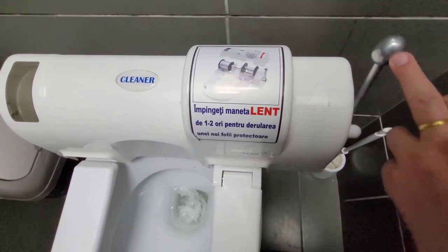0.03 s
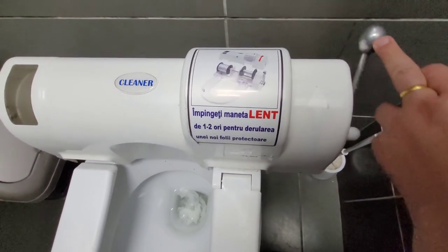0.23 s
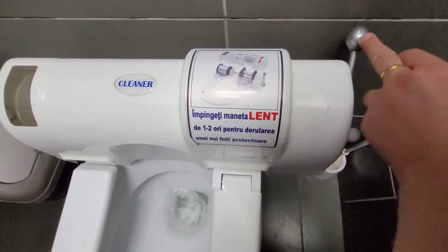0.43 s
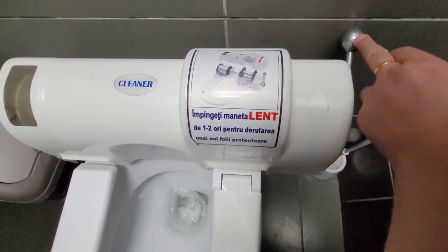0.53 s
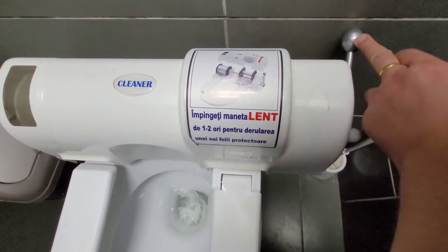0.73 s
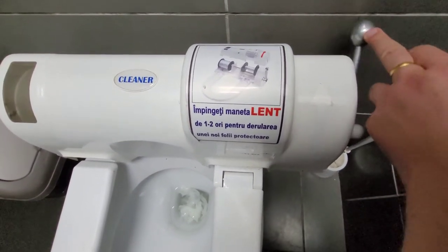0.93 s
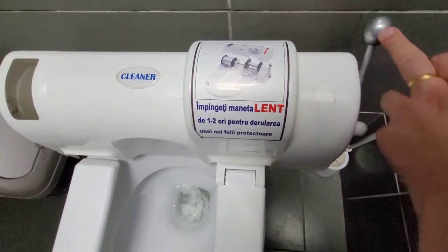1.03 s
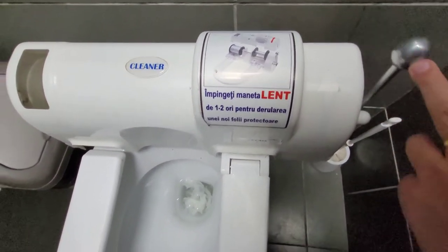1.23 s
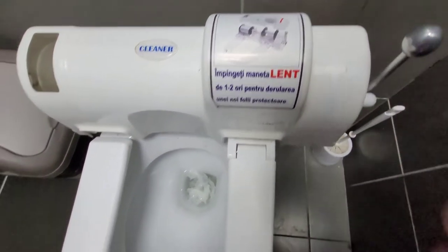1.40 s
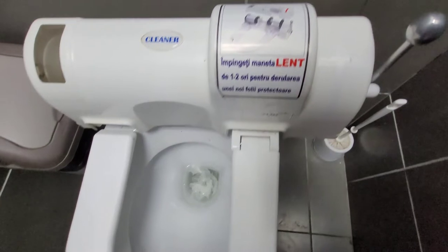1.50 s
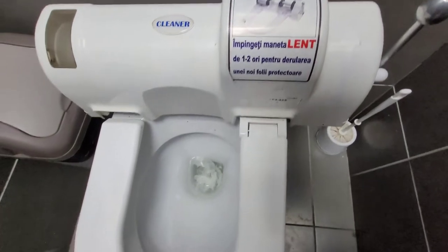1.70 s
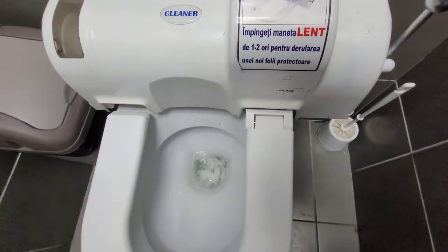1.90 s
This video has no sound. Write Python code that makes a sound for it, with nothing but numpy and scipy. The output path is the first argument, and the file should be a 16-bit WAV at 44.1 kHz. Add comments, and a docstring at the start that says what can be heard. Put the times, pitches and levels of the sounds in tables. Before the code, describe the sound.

Close up in a small tiled restroom, a seat cover dispenser's lever is worked. Two hollow knocks over softly hissing film lead to a loud metallic clack, then a faint squeak, a scraping clunk and a ringing spring.

```python
"""Seat cover dispenser in a small tiled restroom

Close by, a metal lever is pushed and let go. The cover film hisses off its roll while the drive
knocks twice in the hollow plastic housing. The lever clacks against its stop and shakes the housing,
squeaks faintly on the way back, then lands with a scrape, a low clunk and a ringing spring.
The tiles add a short echo, and faint room noise lies under it all."""
import sys
import numpy as np
from scipy import signal
from scipy.fft import rfft, irfft
from scipy.io import wavfile
from scipy.ndimage import uniform_filter1d, minimum_filter1d

SR = 44100
rng = np.random.default_rng(int(sys.argv[2]) if len(sys.argv) > 2 else 0)


def transcribe(signal):
    """Save signal, clipped to [-1, 1], as a 16-bit WAV file at the path in sys.argv[1]."""
    frames = np.atleast_2d(signal).T
    limited = np.clip(frames, -1, 1)
    pcm = np.round(limited * 32767).astype(np.int16)
    wavfile.write(sys.argv[1], SR, pcm)


N = 85995

# how the room spreads sound in stereo: f/Hz, width (side minus mid)/dB, left minus right/dB
STEREO_SPREAD = [(60, -11.5, -1.5), (200, -14, -2.5), (378, -4.5, 0), (690, -6, 0), (1220, 4, -4.5),
                 (2280, -0.5, -6), (4724, 1, -5), (8100, -5, -3), (14000, -9.5, 0)]
DIRECT_PAN_DB = -3.5  # the dispenser is a little to the right
KNOCK_RISE_S = .005


def housing_knocks(boom_rise_s=.011, boom_pan_db=-2.5, echo_db=-13.5):
    """Each blow rings the hollow shell, rattles loose parts and makes the stall boom."""
    # blows on the housing: t/s, shell level/dB, brightness/Hz, boom level/dB, rattle level/dB
    blows = [(0.1600, -35, 917, -53, -23), (0.2235, -11, 320, -28.5, -13), (0.3690, -12, 410, -32, 8.5),
             (0.3940, -27.5, 604, -38.5, -12), (0.5961, -21.5, 876, -45.5, 9.5),
             (0.6290, -18, 630, -37, -24), (1.3173, -23, 600, -19, 2), (1.3410, -42.5, 591, -28, -18),
             (1.3630, -32.5, 500, -28.5, -3.5)]
    # tones the plastic shell rings at: f/Hz, level/dB, fade time/s
    shell_tones = [(121.4, -22.5, 0.37), (156.5, -23.5, .25), (206, -29.5, .17), (237.4, -3, .3),
                   (248.1, 1.5, 0.14), (282, -9, .3), (319.6, -18, 0.4), (353.3, -24.5, 0.2),
                   (397, -21, 0.44), (433, -21, 0.46), (552.9, -21, 0.45), (704.5, -20.5, 0.46),
                   (829, -16.5, 0.25), (902, -14, 0.34)]
    # deep tones of the wall and stall: f/Hz, level/dB, fade time/s
    stall_tones = [(45.5, -10, .55), (63, -7, .25), (74.8, 0, .62), (110, -9, .15)]
    # dull rattle of the loose parts: f/Hz, level/dB
    rattle_spectrum = [(105, -37.5), (135, -37.5), (190, -27.5), (300, -29), (450, -36.5), (650, -42.5),
                       (900, -45.5), (1600, -59), (3200, -52.5), (8000, -70)]
    shell, boom, rattle_power = 0, 0, 0
    for start, db, bright_hz, boom_db, rattle_db in blows:
        for hz, tone_db, fade_s in shell_tones:
            dulling = np.hypot(1, (hz / bright_hz) ** 2)  # weakens tones above the blow's brightness
            shell = shell + gain(db + tone_db) / dulling * ring(start, hz, KNOCK_RISE_S, fade_s)
        for hz, tone_db, fade_s in stall_tones:
            boom = boom + gain(boom_db + tone_db) * ring(start, hz, boom_rise_s, fade_s)
        rattle_power = rattle_power + (gain(rattle_db) * strike(start, KNOCK_RISE_S, fade_s=.34)) ** 2
    echo_shape = strike(start=.023, rise_s=.008, fade_s=.52)
    room_response = room_noise() * echo_shape / np.linalg.norm(echo_shape)
    echo = signal.fftconvolve(shell[None], room_response, axes=1)[:, :N]
    rattle = np.sqrt(rattle_power) * room_noise(rattle_spectrum)
    return shell * pan(DIRECT_PAN_DB) + boom * pan(boom_pan_db) + gain(echo_db) * echo + rattle


def lever_clack(start=.5594, ring_db=-28, ring_rise_s=.00067):
    """The lever hits its stop: a snap, a hard crack, an echo off the tiles and ringing metal."""
    # snap of first contact: f/Hz, level/dB
    snap_spectrum = [(700, -34.5), (1200, -12), (2400, -17.5), (4000, -15), (5200, -21), (6500, -43.5),
                     (9000, -59)]
    # crack of the hit: f/Hz, level/dB
    crack_spectrum = [(200, -19), (600, -37.5), (1000, -20.5), (1400, -11.5), (1800, -21), (2400, -13.5),
                      (4000, -30), (5200, -39), (6500, -42.5), (15000, -50.5)]
    # echo off the tiles: f/Hz, level/dB
    echo_spectrum = [(150, -29.5), (500, -28), (1000, -32.5), (1400, -26.5), (1750, -24), (2400, -24.5),
                     (3800, -32), (5200, -37), (6500, -51.5), (7600, -40.5), (9000, -59.5), (15000, -47)]
    # tones the metal rings at: f/Hz, level/dB, fade time/s
    metal_tones = [(554.5, -3, .58), (921, -7, .42), (1133, -3, .42), (1292, -4, .35), (1360, -2, .33),
                   (1411, -2, .34), (1453, 1, .38), (1506, -1, .42), (1971, -2, .4), (2055, -3, .35),
                   (2306, -1, .38), (2418, -4, .42), (2462, -5, .38), (2552, -5, .25), (2815, -13, .5),
                   (3650, -11, .3), (4032, -12, .33), (4253, -16, .33), (7547, -25, .25)]
    snap = room_noise(snap_spectrum) * strike(start, rise_s=.0003, fade_s=.023)
    crack = room_noise(crack_spectrum) * strike(start, rise_s=.0022, fade_s=.092)
    echo = room_noise(echo_spectrum) * strike(start, rise_s=.011, fade_s=.49)
    out = bracket(snap + crack + echo)
    for hz, db, fade_s in metal_tones:
        phase, lean = rng.uniform(-np.pi, np.pi, 2)
        # each tone reaches left and right out of step, which makes it sound wide
        shift = np.sign(lean) * np.arctan(gain(look_up(STEREO_SPREAD, hz)))
        tone = ring(start, hz, ring_rise_s, fade_s, phase + shift * np.array([[1], [-1]]))
        out = out + gain(ring_db + db) * pan(look_up(STEREO_SPREAD, hz, column=2)) * tone
    return out


def bracket(sound, dip_db=-5.5):
    """The stop and its bracket vibrate along, lifting some pitches of the clack above others."""
    # pitch ranges the bracket favours: f/Hz, width/Hz, level/dB
    resonances = [(1003, 230, -2.5), (1148, 66, 1), (1375, 87, -3), (1475, 110, 3), (2054, 84, -3.5),
                  (2350, 130, 0), (2548, 100, -6), (2774, 190, 0), (3280, 220, -5), (3724, 140, -2),
                  (3950, 220, -1), (5030, 460, -5.5)]
    hz = np.arange(N // 2 + 1) * SR / N
    peaks = sum(gain(db) / (1 + 2j * (hz - centre) / width) for centre, width, db in resonances)
    dip = gain(dip_db * np.interp(hz, [600, 1000, 5000, 6500], [0, 1, 1, 0]))
    return irfft(rfft(sound) * (dip + peaks), N)


def ticks(tilt_centre_hz=3704, peak_db=-2):
    """Small parts tick and scrape, each with a short peak and a longer tail in the room."""
    # light contacts: t/s, level/dB, rise time/s, tilt (higher is brighter)/dB per octave
    contacts = [(0.16, -21, 0.0011, -7.5), (0.2254, -11.5, 0.0023, -7.5), (0.311, -5.5, 0.0081, -0.5),
                (0.375, -2.5, 0.0083, -5), (0.393, -1, 0.00071, 1), (1.3064, -3, 0.00058, 3.5),
                (1.309, -2, .003, -2.5), (1.318, -4, 0.0015, -2), (1.682, -23, .003, 9.5)]
    # noise of a contact before it is tilted: f/Hz, level/dB
    tick_spectrum = [(300, -50), (800, -45), (1600, -46), (3000, -47), (5000, -44), (6500, -52.5),
                     (8000, -49), (9300, -64.5), (10600, -52), (12000, -65), (15500, -70)]
    out = 0
    for start, db, rise_s, tilt in contacts:
        tilted = [(hz, level + tilt * np.log2(hz / tilt_centre_hz)) for hz, level in tick_spectrum]
        peak = gain(peak_db) * strike(start, rise_s, fade_s=.047)
        tail = strike(start, rise_s, fade_s=.39)
        out = out + gain(db) * (peak + tail) * room_noise(tilted)
    return out


def return_spring(start=1.32):
    """The spring rings on after the lever lands back at rest."""
    # tones of the spring: f/Hz, level/dB, fade time/s
    spring_tones = [(290.7, -36, 0.56), (398, -38.5, 0.73), (581, -51, .4), (893, -60, 0.48)]
    ringing = sum(gain(db) * ring(start, hz, KNOCK_RISE_S, fade_s) for hz, db, fade_s in spring_tones)
    return ringing * pan(DIRECT_PAN_DB)


def film_feed():
    """The roller rumbles as it turns and pulls the hissing film off the roll."""
    # hiss of the sliding film: f/Hz, level/dB
    film_spectrum = [(500, -60), (1500, -62), (3000, -63), (6000, -64), (7800, -62.5), (9500, -62.5),
                     (12500, -52), (15500, -56.5)]
    # its loudness over time: t/s, level/dB
    film_levels = [(0, -1), (.35, -0.5), (.55, -5), (.68, -2.5), (.76, -11.5), (.84, -23), (.95, -47)]
    # rumble of the roller: f/Hz, level/dB
    roller_spectrum = [(30, -52.5), (65, -39), (110, -54), (170, -53.5), (255, -37), (340, -48),
                       (520, -50.5), (900, -58.5), (1800, -60), (4000, -81.5)]
    # its loudness over time: t/s, level/dB
    roller_levels = [(0, -11), (.08, -0.5), (.12, 0), (.35, -1), (.55, -1), (.75, -5.5), (.95, -21),
                     (1.05, -15.5), (1.28, -14.5), (1.5, -24)]
    film = room_noise(film_spectrum) * fader(film_levels)
    roller = room_noise(roller_spectrum) * fader(roller_levels)
    return film + roller


def pivot(pitch_arch=.06, roughness=.005):
    """The pivot rubs on the way back, with thin squeaks whose pitch follows the lever's speed."""
    # squeaks: t/s, length/s, top pitch/Hz, level/dB
    squeaks = [(1.005, 0.12, 7850, -68), (1.183, 0.057, 7900, -75)]
    # soft rubbing: f/Hz, level/dB
    rub_spectrum = [(350, -63), (550, -64.5), (900, -70), (1500, -67.5), (2500, -63.5), (3000, -71),
                    (3700, -84), (5200, -71.5), (6300, -88)]
    # its loudness over time: t/s, level/dB
    rub_levels = [(.92, -6), (1.0, 0.5), (1.06, 1.5), (1.2, -1), (1.28, -8), (1.36, -16)]
    squeaking = 0
    for start, length, hz, db in squeaks:
        speed = np.sin(np.pi * np.clip((clock() - start) / length, 0, 1))
        wobble = uniform_filter1d(rng.standard_normal(N), size=60)
        pitch = hz * (1 - pitch_arch * (1 - speed) + roughness * wobble / wobble.std())
        squeaking = squeaking + gain(db) * speed ** 2 * np.sin(2 * np.pi * np.cumsum(pitch) / SR)
    return squeaking * pan(DIRECT_PAN_DB) + room_noise(rub_spectrum) * fader(rub_levels)


def background():
    """Faint air noise, high hiss and low rumble, each swelling and fading."""
    # air in the room: f/Hz, level/dB
    air_spectrum = [(100, -70.5), (140, -68.5), (250, -68.5), (400, -68), (540, -69.5), (660, -70),
                    (850, -65), (1050, -73.5), (2200, -69.5), (2900, -82.5)]
    # its loudness over time: t/s, level/dB
    air_levels = [(0, -14), (.9, -0.5), (1.25, 2.5), (1.6, 1.5), (1.75, -3), (1.86, 1.5), (1.95, 5)]
    # high hiss: f/Hz, level/dB
    hiss_spectrum = [(3000, -74.5), (5000, -72), (7500, -71), (10000, -73), (15500, -74.5)]
    # its loudness over time: t/s, level/dB
    hiss_levels = [(0, 3), (.75, -3), (.9, -6), (1.28, -5.5), (1.45, 1), (1.7, 0.5), (1.95, 1)]
    # low rumble: f/Hz, level/dB
    rumble_spectrum = [(20, -69), (33, -58), (48, -57.5), (65, -51.5), (85, -73), (160, -74), (400, -97)]
    # its loudness over time: t/s, level/dB
    rumble_levels = [(0, 0), (.8, 2), (.89, 13), (.98, -6.5), (1.12, -5.5), (1.2, 1), (1.8, -3),
                     (1.87, 5.5), (1.915, 19), (1.95, -3)]
    air = room_noise(air_spectrum) * fader(air_levels)
    hiss = room_noise(hiss_spectrum) * fader(hiss_levels)
    rumble = room_noise(rumble_spectrum) * fader(rumble_levels)
    return air + hiss + rumble


def room_noise(spectrum=None):
    """Stereo noise as it comes off the walls: white, or shaped by a table of levels per octave band."""
    hz = np.maximum(np.arange(N // 2 + 1) * SR / N, 1)
    mid, side = rfft(rng.standard_normal((2, N)))  # what left and right share, and what sets them apart
    width = gain(look_up(STEREO_SPREAD, hz))
    stereo = np.array([mid + width * side, mid - width * side]) / np.hypot(1, width)
    stereo = stereo * pan(look_up(STEREO_SPREAD, hz, column=2))
    if spectrum is not None:
        edge_fade = np.minimum(hz / spectrum[0][0], 1) ** 2 * np.minimum(spectrum[-1][0] / hz, 1) ** 2
        per_octave = np.sqrt(SR / hz / np.sqrt(2))
        stereo = stereo * gain(look_up(spectrum, hz)) * per_octave * edge_fade
    return irfft(stereo, N)


def ring(start, hz, rise_s, fade_s, phase=0):
    """One pure tone of a struck object."""
    return strike(start, rise_s, fade_s) * np.sin(2 * np.pi * hz * (clock() - start) + phase)


def strike(start, rise_s, fade_s):
    """Loudness of a hit: it rises quickly, then falls by 60 dB over the fade time."""
    age = np.maximum(clock() - start, 0)
    return (1 - np.exp(-age / rise_s)) * np.exp(-np.log(1000) * age / fade_s)


def fader(levels):
    """A volume that glides through points of t/s, level/dB."""
    return gain(np.interp(clock(), *np.array(levels, float).T))


def pan(db):
    """Left and right volumes; positive decibels move the sound left."""
    return gain(np.array([np.atleast_1d(db), -np.atleast_1d(db)]) / 2)


def look_up(table, hz, column=1):
    """A table's value at any frequency, blending between rows on an octave scale."""
    rows = np.array(table, float)
    return np.interp(np.log(hz), np.log(rows[:, 0]), rows[:, column])


def gain(db):
    """Turn decibels into a multiplier."""
    return 10 ** (np.asarray(db) / 20)


def clock():
    """Time of every sample in seconds."""
    return np.arange(N) / SR


def scene():
    """The dispenser and the room, added together."""
    hits = housing_knocks() + lever_clack() + return_spring() + ticks()
    return hits + film_feed() + pivot() + background()


def record(dry, ceiling=.6, top_hz=15900):
    """A limiter turns the loudest peaks down, and a filter cuts the highest treble."""
    allowed = np.minimum(1, ceiling / (np.abs(dry).max(axis=0) + 1e-9))
    volume = uniform_filter1d(minimum_filter1d(allowed, size=200), size=200)
    treble_cut = signal.ellip(10, .2, 80, top_hz, fs=SR, output="sos")
    return signal.sosfilt(treble_cut, dry * volume)


dry = scene()
out = record(dry)
transcribe(out)
```